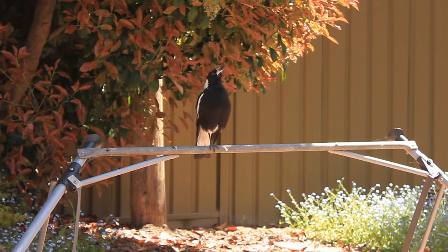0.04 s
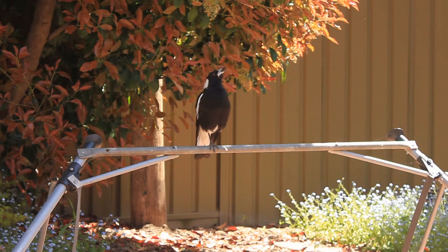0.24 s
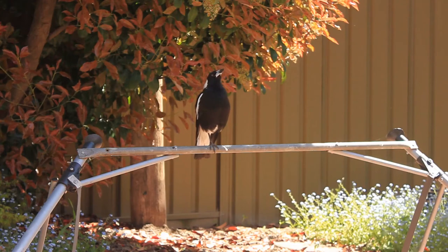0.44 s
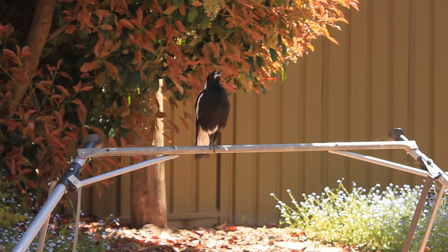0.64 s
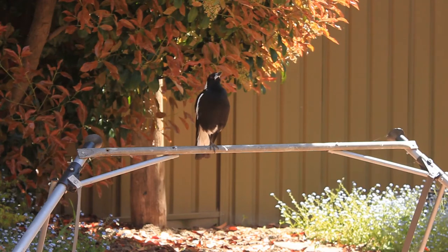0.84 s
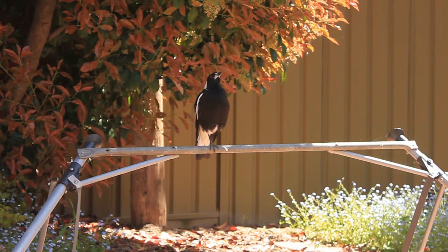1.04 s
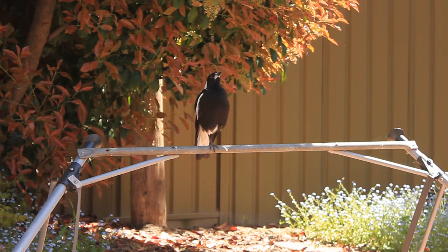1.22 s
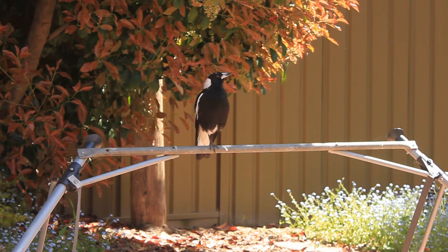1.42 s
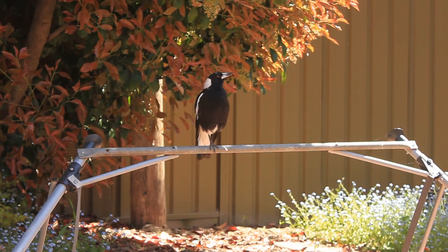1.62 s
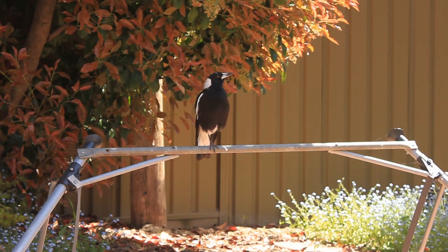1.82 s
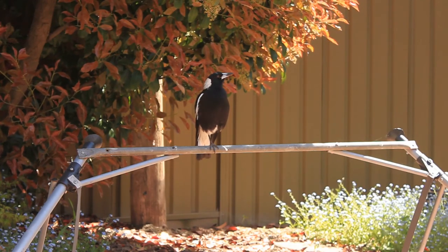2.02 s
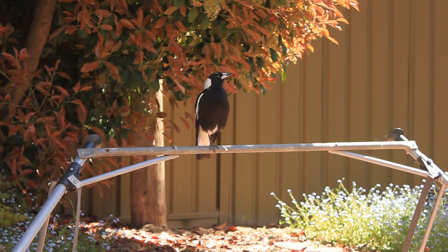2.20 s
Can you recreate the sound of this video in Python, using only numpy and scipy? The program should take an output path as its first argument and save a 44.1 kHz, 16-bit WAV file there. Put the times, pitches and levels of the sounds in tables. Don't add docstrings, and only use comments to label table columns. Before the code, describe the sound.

Already mid-song, a magpie gives low gliding, beating notes, then squeezed whistles and a last hoot within about a second; faint distant bird calls and chirps follow over soft traffic and leaf hush, outdoors, microphone fairly near.

```python
import sys
import numpy as np
from scipy import signal
from scipy.io import wavfile
from scipy.ndimage import uniform_filter1d

SR = 44100
rng = np.random.default_rng(int(sys.argv[2]) if len(sys.argv) > 2 else 0)


def put_to_file(sound):
    columns = np.atleast_2d(sound).T
    safe = np.clip(columns, -1, 1)
    whole_steps = np.round(safe * 32767)
    wavfile.write(sys.argv[1], SR, whole_steps.astype(np.int16))


def invert_db(x):
    u = np.asarray(x, float) / 20
    return 10 ** u


N = 99533
LEAD = SR // 2
PURE = [(1, 0)]  # (multiple, level [dB])
# (multiple, level [dB])
FLUTY_ORDERS = [(1, 0.5), (2, -34.5), (3, -45), (4, -44)]


def voice(notes, orders, rise, fall, shake, flutter_db, rasp_rad, colour=((1, 0),)):
    out = np.zeros(N + SR)
    for start_s, length_s, from_hz, to_hz, db in notes:
        t = np.arange(0, length_s, 1 / SR)
        drift, flutter, grit = (waver(size)[:len(t)] for size in (200, 260, 100))
        hz = (from_hz + (to_hz - from_hz) * t / length_s) * (1 + shake * drift)
        phase = 2 * np.pi * np.cumsum(hz) / SR + rasp_rad * grit
        ramp = np.minimum(t / rise, (length_s - t) / fall) / length_s
        shape = np.sin(np.pi / 2 * np.clip(ramp, 0, 1)) ** 2
        tone = np.zeros(len(t))
        for k, order_db in orders:
            if k * from_hz < SR / 2.5:
                tone += invert_db(order_db + read(colour, k * from_hz)) * np.sin(k * phase)
        at = round((start_s + 0.5) * SR)
        out[at:at + len(t)] += np.sqrt(2) * invert_db(db + flutter_db * flutter) * shape * tone
    return out


def waver(size):
    noise = rng.standard_normal(SR // 2)
    return evened(uniform_filter1d(uniform_filter1d(noise, size), size))


def evened(x):
    return x / np.sqrt(np.mean(x ** 2) + 1e-20)


def read(points, hz):
    f, value = np.transpose(points)
    return np.interp(np.log(hz + 1), np.log(f + 1), value)


def carol():
    # (start [s], length [s], start [Hz], end [Hz], level [dB])
    notes = [
        (.252, 0.036, 972, 955, -26),
        (.281, 0.05, 955, 958, -20.5),
        (.336, 0.013, 990, 1013, -28),
        (.358, .02, 963, 974, -34.5),
    ]
    # (multiple, level [dB])
    orders = [(1, 4.5), (2, -31.5), (3, -29), (4, -28), (5, -35), (6, -35.5), (8, -47), (9, -36.5),
              (10, -51), (12, -39.5), (13, -33)]
    return voice(notes, orders, rise=0.2, fall=0.19, shake=0.0043, flutter_db=0.3, rasp_rad=0.04)


def opening():
    # (start [s], length [s], start [Hz], end [Hz], level [dB])
    notes = [
        (-.02, .14, 932, 918, -32),
    ]
    # (multiple, level [dB])
    orders = [(1, -1), (2, -12.5), (3, -32.5), (4, -22), (5, -26), (6, -37), (7, -43), (10, -34),
              (13.5, -34)]
    return voice(notes, orders, rise=0.69, fall=0.1, shake=0.0083, flutter_db=1.0, rasp_rad=0.072)


def flute():
    # (start [s], length [s], start [Hz], end [Hz], level [dB])
    notes = [(-.04, .148, 990, 972, -26.5), (.112, .035, 975, 955, -32), (.115, .045, 810, 770, -30),
             (.148, .035, 730, 640, -40), (.17, .06, 830, 885, -34), (.233, .021, 1040, 1010, -25),
             (.36, .024, 830, 670, -32), (.378, .045, 775, 765, -34.5), (.43, .03, 770, 770, -38),
             (.395, .065, 1160, 1180, -37), (.5, .055, 790, 820, -48), (.905, .03, 1140, 1075, -46)]
    return voice(notes, FLUTY_ORDERS, rise=0.091, fall=0.12, shake=0.012, flutter_db=1.24, rasp_rad=0.091)


def squeeze():
    # (start [s], length [s], start [Hz], end [Hz], level [dB])
    notes = [
        (.16, 0.093, 933, 1018, -41),
        (.2, 0.072, 1023, 1002, -39.5),
        (.23, 0.1, 953, 949, -49.5),
        (.24, .05, 850, 890, -76),
    ]
    # (multiple, level [dB])
    orders = [(3, -17.5), (4, -4.5), (6, -20.5)]
    return voice(notes, orders, rise=0.36, fall=0.32, shake=0.0039, flutter_db=2.26, rasp_rad=0.22)


def husky():
    # (start [s], length [s], start [Hz], end [Hz], level [dB])
    notes = [
        (-.03, .07, 1300, 1330, -38),
        (.19, .05, 1190, 1330, -39),
        (.236, .03, 1420, 1590, -36),
        (.24, .04, 1250, 1330, -38),
        (.262, .05, 1380, 1500, -38),
        (.322, .075, 1320, 1340, -41),
    ]
    # (multiple, level [dB])
    orders = [(1, 3.5), (2, -19.5), (4, -24.5)]
    return voice(notes, orders, rise=0.085, fall=0.62, shake=0.021, flutter_db=0.93, rasp_rad=0.51)


def hoot():
    # (start [s], length [s], start [Hz], end [Hz], level [dB])
    notes = [
        (.918, .14, 1067, 1046, -33),
    ]
    return voice(notes, FLUTY_ORDERS, rise=0.25, fall=0.67, shake=0.00284, flutter_db=1.9, rasp_rad=0.15)


def whistles():
    # (start [s], length [s], start [Hz], end [Hz], level [dB])
    notes = [
        (.545, .075, 1890, 1915, -48),
        (.548, .07, 2800, 2870, -49),
        (.525, .1, 2050, 2130, -51),
        (.58, .09, 2380, 2402, -40),
        (.605, .065, 2990, 2998, -33.5),
        (.6, .12, 2510, 2480, -50),
        (.655, .115, 2160, 2190, -44),
        (.665, .105, 2920, 2915, -38),
        (.69, .082, 2325, 2340, -43),
    ]
    # (multiple, level [dB])
    orders = [(1, 0), (2, -13.5), (3, -11), (4, -14), (5, -27)]
    # (frequency [Hz], level [dB])
    beak = [(2000, -1.5), (3000, -2.5), (3700, -1), (4700, 4), (5800, -29), (6900, 1), (7700, -2),
            (9000, -22.5)]
    return voice(notes, orders, rise=0.25, fall=0.2, shake=0.006, flutter_db=2.2, rasp_rad=0.3, colour=beak)


def reed():
    # (start [s], length [s], start [Hz], end [Hz], level [dB])
    notes = [
        (.665, .125, 1140, 1175, -43),
        (.84, .115, 1445, 1475, -48),
    ]
    # (multiple, level [dB])
    orders = [(1, -2.5), (2, -14.5), (3, -37), (5, -54)]
    return voice(notes, orders, rise=0.3, fall=0.1, shake=0.008, flutter_db=2.6, rasp_rad=0.25)


def pips():
    # (start [s], length [s], start [Hz], end [Hz], level [dB])
    notes = [(.12, 0.045, 4250, 4370, -60.5), (.14, 0.079, 13150, 13250, -62.5),
             (.508, 0.065, 4060, 4080, -43), (.565, 0.13, 4080, 3995, -59.5),
             (.575, 0.035, 4330, 4360, -54), (.52, 0.035, 6250, 6200, -62), (.84, 0.21, 4730, 4720, -64),
             (.885, 0.068, 7230, 7200, -57.5), (.91, 0.071, 7000, 6980, -46.5), (.94, 0.1, 4250, 4200, -52),
             (.96, 0.07, 4070, 4005, -54), (.96, .07, 9600, 9250, -69.5), (1.15, 0.14, 7030, 7070, -42.5),
             (1.16, 0.1, 7230, 7170, -45), (1.17, 0.041, 8000, 7900, -65)]
    return voice(notes, PURE, rise=0.23, fall=0.26, shake=0.0047, flutter_db=3.0, rasp_rad=0.31)


def side_tones():
    # (start [s], length [s], start [Hz], end [Hz], level [dB])
    notes = [(-.01, .112, 1056, 1048, -34), (.045, .09, 1130, 1115, -43.5), (0, 0.04, 1000, 1300, -44),
             (.1, 0.068, 1320, 1340, -49), (.15, .04, 1150, 1180, -46), (.93, 0.087, 1140, 1160, -48),
             (1.2, 0.039, 860, 800, -56), (1.2, 0.062, 1160, 1280, -58), (1.28, 0.056, 1080, 1190, -58.5),
             (.74, 0.13, 1790, 1800, -58), (.97, 0.084, 1830, 1820, -60), (.95, 0.074, 2120, 2100, -59.5)]
    return voice(notes, PURE, rise=0.23, fall=0.19, shake=0.008, flutter_db=1.5, rasp_rad=0.12)


def strands():
    # (start [s], length [s], start [Hz], end [Hz], level [dB])
    notes = [(.2, 0.12, 5480, 5500, -58), (.2, 0.11, 5100, 5150, -61.5), (.235, .035, 4600, 4200, -55),
             (.235, 0.039, 2520, 2540, -52), (.13, 0.069, 2800, 2950, -60), (.145, .06, 5700, 6100, -62),
             (.23, .14, 13000, 13000, -65), (.24, .12, 8950, 8850, -65), (0.547, .07, 2980, 2960, -52),
             (.61, .07, 3100, 2800, -47), (.62, 0.065, 2200, 2150, -50), (.6, 0.14, 2600, 2560, -55),
             (.66, .12, 4450, 4460, -54.5), (.565, 0.056, 7720, 7660, -55.5),
             (.65, 0.116, 6560, 6600, -55.5), (.64, .1, 8350, 8300, -61), (.875, .1, 4410, 4270, -58),
             (1.19, .06, 4000, 3990, -64), (1.16, 0.086, 7800, 7750, -63), (0.893, 0.13, 7700, 7750, -68.5),
             (1.46, .12, 3250, 3290, -54), (1.92, 0.063, 3500, 3150, -57), (.57, .05, 3990, 4000, -50),
             (.575, .08, 6950, 7000, -58), (.68, .055, 8760, 8740, -58), (.96, .05, 9250, 9230, -68),
             (.97, .05, 3430, 3420, -63), (1.52, .04, 4080, 4090, -64), (2.02, 0.054, 5550, 5480, -64),
             (2.0, .06, 4100, 4080, -68), (2.01, .04, 2950, 2850, -67), (2.02, .05, 4480, 4300, -62.5)]
    return voice(notes, PURE, rise=0.28, fall=0.34, shake=0.0061, flutter_db=2.7, rasp_rad=0.35)


def far_magpie():
    # (start [s], length [s], start [Hz], end [Hz], level [dB])
    notes = [
        (.98, 0.08, 790, 769, -50),
        (1.07, 0.075, 775, 755, -48),
        (1.15, 0.085, 757, 748, -45),
        (1.06, 0.03, 1114, 1083, -52.5),
        (1.3, 0.081, 1017, 900, -51.5),
        (1.415, 0.046, 788, 773, -53.5),
    ]
    return voice(notes, PURE, rise=0.3, fall=0.3, shake=0.006, flutter_db=1.5, rasp_rad=0.12)


def chirps():
    # (start [s], length [s], start [Hz], end [Hz], level [dB])
    notes = [
        (1.35, .09, 3170, 3260, -60),
        (1.41, .055, 3240, 3300, -50),
        (1.455, .035, 3320, 3450, -38),
        (1.5, .07, 3430, 3480, -52),
        (1.928, .08, 3370, 3400, -49),
        (1.958, .08, 4390, 4430, -51),
        (2.012, .045, 5830, 5720, -58),
        (1.13, .115, 2060, 2100, -52),
        (.7, .075, 6930, 6880, -51),
    ]
    return voice(notes, PURE, rise=0.3, fall=0.3, shake=0.005, flutter_db=2.2, rasp_rad=0.15)


def twitter():
    # (start [s], length [s], start [Hz], end [Hz], level [dB])
    notes = [
        (1.842, 0.1096, 2978, 3196, -55),
    ]
    orders = [(1, 1.5), (2, -8)]  # (multiple, level [dB])
    return voice(notes, orders, rise=0.2, fall=0.26, shake=0.007, flutter_db=2.6, rasp_rad=0.2)


def garden(x):
    # (frequency [Hz], t60 [s])
    decay = [(500, 0.17), (1000, 0.52), (3000, 0.27), (7000, 0.34), (13000, 0.1)]
    # (delay [s], level [dB])
    echoes = [
        (.009, -15),
        (.017, -5),
        (.031, 1),
        (0.053, -14.5),
    ]
    taps = np.zeros(SR)
    at = np.arange(400, SR - 20, 20)
    taps[at + rng.integers(0, 20, len(at))] = rng.choice([-1., 1.], len(at))
    hz, t, z = signal.stft(taps, SR, nperseg=256)
    fade_db = -60 * t / read(decay, hz)[:, None]
    tail = signal.istft(z * invert_db(fade_db), SR, nperseg=256)[1]
    tail = tail / np.linalg.norm(tail)
    for delay_s, db in echoes:
        tail[round(delay_s * SR)] += invert_db(db)
    return signal.fftconvolve(x, tail)[:len(x)]


def hush():
    # (frequency [Hz], density [dB per Hz])
    spectrum = [(15, -16), (25, -9.5), (174, -3), (323, -3), (411, -2), (615, -4), (999, -5.5),
                (3740, -15.5), (15600, -32)]
    frames, hz = N // 256 + 5, np.fft.rfftfreq(1024, 1 / SR)
    a, b, patches = rng.standard_normal((frames, 513, 3)).T
    patches = uniform_filter1d(patches, size=12, axis=0)
    patches = evened(uniform_filter1d(patches, size=14, axis=1))
    z = (a + 1j * b) * invert_db(read(spectrum, hz)[:, None] + 1.13 * patches)
    noise = signal.istft(z, nperseg=1024, noverlap=768)[1][:N]
    return invert_db(-55) * evened(noise)


def scene():
    # (sound, garden send [dB])
    layers = [(carol(), -19),
              (opening() + flute() + squeeze() + husky(), -13),
              (hoot(), -17.5),
              (whistles() + reed() + pips(), -10.5),
              (far_magpie() + chirps() + twitter(), -9),
              (side_tones() + strands(), -12)]
    direct = sum(sound for sound, _ in layers)
    wet = garden(sum(invert_db(send_db) * sound for sound, send_db in layers))
    return ((direct + wet)[LEAD:][:N] + hush())[None]


def roll_off(x):
    return signal.sosfilt(signal.butter(12, 15710, fs=SR, output="sos"), x)


def record(dry):
    b, a = signal.butter(2, 60, "high", fs=SR)
    mix = signal.lfilter(b, a, dry)
    return roll_off(mix)


dry = scene()
out = record(dry)
put_to_file(out)
```